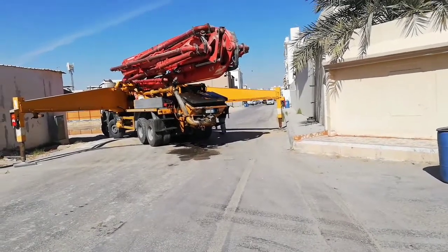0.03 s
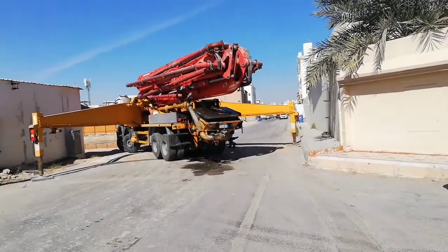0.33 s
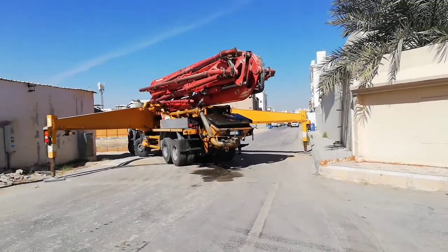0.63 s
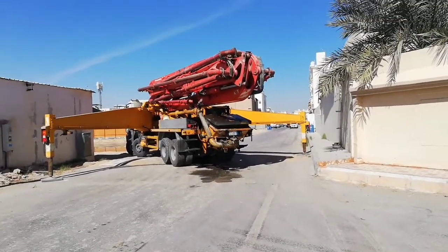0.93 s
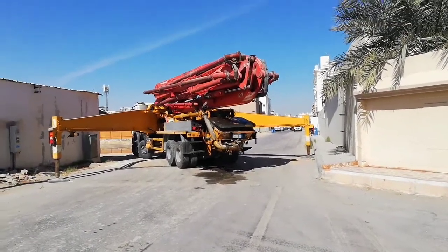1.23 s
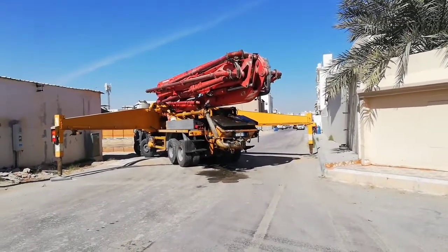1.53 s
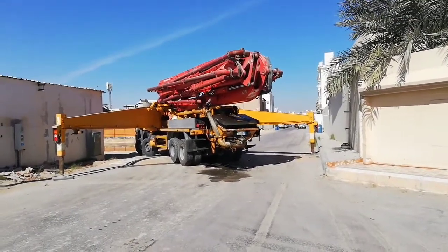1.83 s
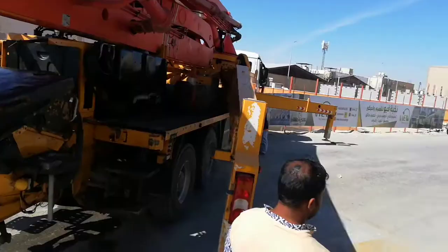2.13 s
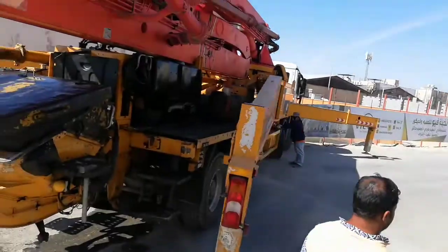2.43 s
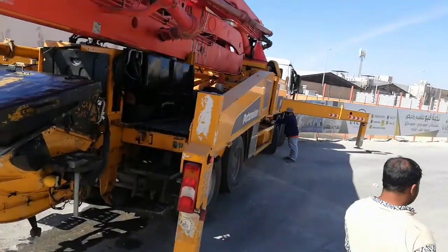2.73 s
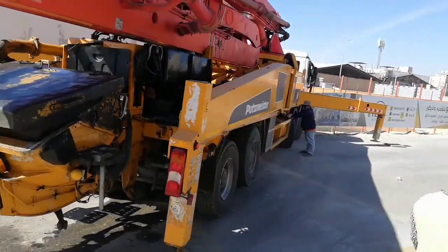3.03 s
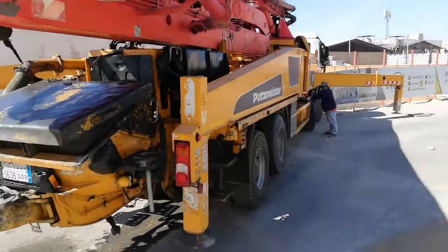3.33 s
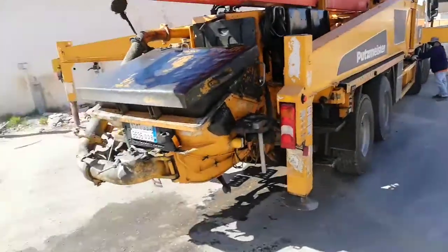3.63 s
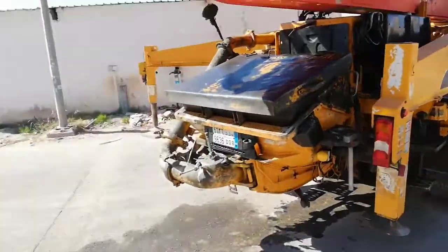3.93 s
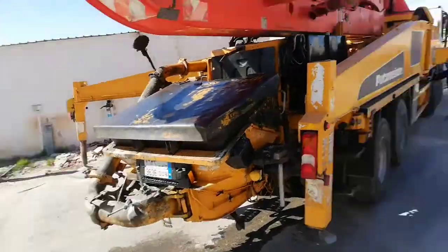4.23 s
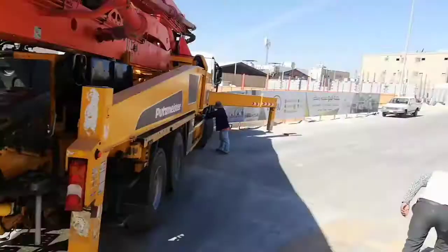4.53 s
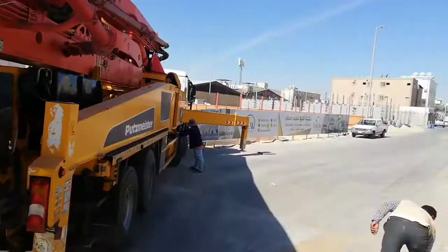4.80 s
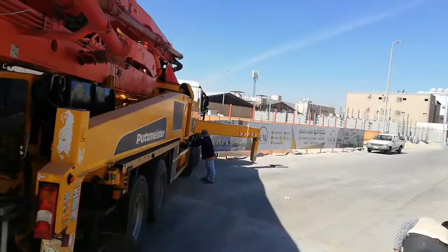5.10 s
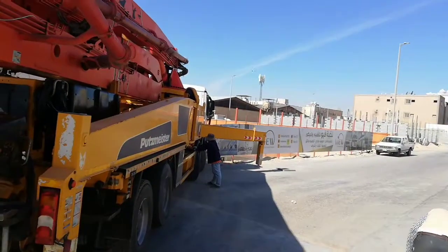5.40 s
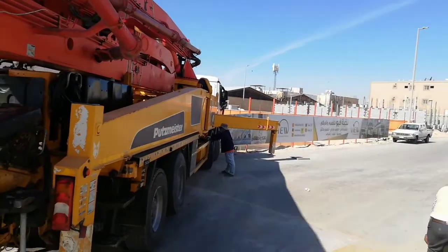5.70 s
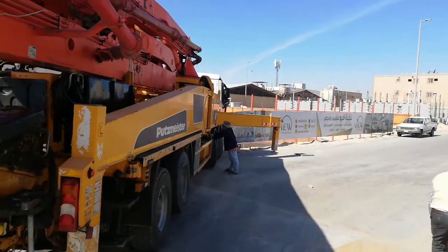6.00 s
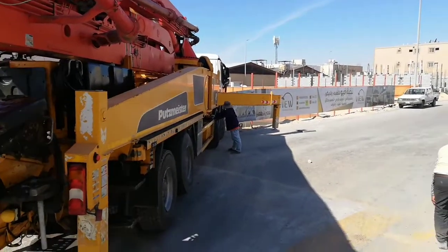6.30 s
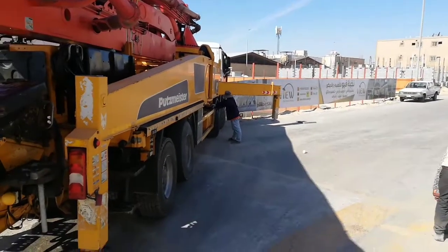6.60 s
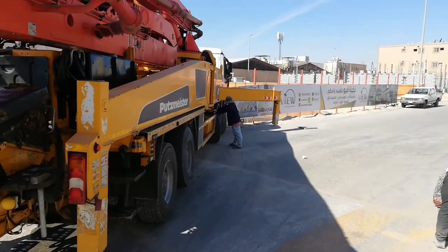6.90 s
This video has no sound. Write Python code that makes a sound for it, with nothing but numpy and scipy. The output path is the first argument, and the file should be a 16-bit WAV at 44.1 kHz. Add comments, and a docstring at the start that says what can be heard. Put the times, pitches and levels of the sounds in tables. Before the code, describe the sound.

From some way down a street comes the even whine and diesel drone of a concrete pump truck. After a moment of silence the machine is right alongside, rumbling and clattering. A quick cluster of steel clanks and scrapes stands out, followed by narrow high hisses and a faint short rattle as the whine wavers on. The hand-held microphone moves beside the truck, catching light wind and a few dull thuds.

```python
"""A truck-mounted concrete pump whines in a walled street: its piston and gear pumps ripple the oil.
The diesel that drives them throbs and clatters; there are narrow high hisses and one brief rattle.
It is heard from afar, then, after a short silence, from beside the truck, where a steel part clanks
and scrapes by stick-slip friction and the listener walks round to stand aside.
Light gusts and bumps reach the hand-held microphone."""
import sys
import numpy as np
from scipy import signal
from scipy.fft import rfft, irfft
from scipy.io import wavfile
from scipy.ndimage import uniform_filter1d

SR = 44100
rng = np.random.default_rng(int(sys.argv[2]) if len(sys.argv) > 2 else 0)


def wav_record(signal):
    """Record a signal, one row per channel, as 16-bit PCM in the file named by sys.argv[1]."""
    frames = np.transpose(np.atleast_2d(signal))
    bounded = np.clip(frames, -1, 1)
    # unit amplitude maps onto the largest positive 16-bit level
    quanta = np.round(bounded * 32767).astype(np.int16)
    wavfile.write(sys.argv[1], SR, quanta)


N = 315315
TIME, FREQS = np.arange(N) / SR, np.fft.rfftfreq(N, 1 / SR)
FAR_ENDS_S, NEAR_STARTS_S, WALK_STARTS_S, WALK_ENDS_S = 1.962, 2.279, 3.35, 3.87


def amp(db):
    """Decibels to amplitude ratio."""
    return 10 ** (np.asarray(db) / 20)


def unit(x):
    """Normalisation to rms 1."""
    return x / np.sqrt(np.mean(abs(x) ** 2) + 1e-20)


def curves(rows):
    """Linear interpolation of each column of a time table."""
    time_s, *columns = np.transpose(rows)
    return [np.interp(TIME, time_s, column) for column in columns]


def spectrum(points):
    """Interpolation of a table over log frequency."""
    hz, value = np.transpose(points)
    return np.interp(np.log(FREQS + 1), np.log(hz + 1), value)


def drift(rate_hz, size=4096):
    """Random modulation: low-passed noise of rms 1."""
    hz = np.fft.rfftfreq(size, TIME[-1] / size)
    slow = irfft(rfft(rng.standard_normal(size)) / (1 + (hz / rate_hz) ** 4))
    return np.interp(TIME, np.linspace(0, TIME[-1], size), unit(slow))


def colour(x, points):
    """Spectral shaping; the mean of the channels has rms 1."""
    shaped = irfft(rfft(x) * amp(spectrum(points)), N)
    return shaped / shaped.mean(0).std()


def tone(cycles, level_db, flutter, flutter_hz, pan_db=0, lead_rad=0):
    """A partial as a steady plus a random phasor; flutter (0-1) is the random one's amplitude."""
    left = amp(pan_db / 2) * np.exp(.5j * lead_rad) * np.ones(N)
    pair = np.array([left, 1 / left])
    phasor = np.sqrt(1 - flutter ** 2) + flutter * (drift(flutter_hz) + 1j * drift(flutter_hz)) / 2 ** .5
    wave = phasor * np.exp(2j * np.pi * (cycles + rng.random()))
    return np.sqrt(2) * amp(level_db) * (pair * wave).real / abs(pair.mean(0))


def far_or_near(far, near):
    """A step from the distant value to the one beside the truck."""
    return np.where(TIME < FAR_ENDS_S, far, near)


def standpoint(far, close, aside):
    """A step from far to close, then a ramp during the walk."""
    return far_or_near(far, np.interp(TIME, [WALK_STARTS_S, WALK_ENDS_S], [close, aside]))


# Likeness of the two microphone ports: frequency_hz, coherence
COHERENCE = [(60, 0.85), (200, 1), (400, 0.25), (800, 0.35), (1500, 0.12), (4000, 0.17), (9000, 0.11),
             (15000, 0.28)]
# Balance from afar and beside the truck: frequency_hz, left_minus_right_db
FAR_BALANCE = [(60, 0), (110, -12), (200, -4), (380, -8.5), (700, 8), (1290, -6.5), (2380, -1), (4400, -6),
               (8120, -1), (15000, 1.5)]
NEAR_BALANCE = [(60, 0), (110, -2.5), (200, 0), (380, 2), (700, -5), (1290, -5.5), (2380, -5.5), (4400, -7),
                (8120, -2), (15000, -4.5)]

def ports(a, b, far_lag_ms=-0.338, near_lag_ms=0.3045):
    """Partial coherence: two independent signals mix into a pair with time and level differences."""
    right, coherence = rfft(a), spectrum(COHERENCE)
    left = coherence * right + np.sqrt(1 - coherence ** 2) * rfft(b)
    pairs = []
    for lag_ms, balance in (far_lag_ms, FAR_BALANCE), (near_lag_ms, NEAR_BALANCE):
        delayed = left * np.exp(-2j * np.pi * FREQS * lag_ms / 1000)
        pairs.append(irfft(np.array([delayed, right]) * amp(np.outer([.5, -.5], spectrum(balance))), N))
    return far_or_near(*pairs)


def air():
    """Turbulence: broadband noise, partly coherent at the two ports."""
    return ports(*rng.standard_normal((2, N)))


# Gusts: peak_s, strength_db, rise_s, fall_s
GUSTS = [(.82, -24.5, .15, 0.097), (3.62, -24, 0.27, 0.63), (5.1, -37, 0.68, .6)]
# Wind spectrum: frequency_hz, density_db
WIND_SPECTRUM = [(15, -30), (26, -14), (38, -3.5), (62, -1.5), (100, -5.5), (200, -28), (400, -41),
                 (1000, -66)]

def wind(breeze_db=-39.5):
    """Turbulent pressure at the microphone: an uneven rumble, alike at both ports."""
    strength = amp(breeze_db)
    for peak_s, db, rise_s, fall_s in GUSTS:
        width_s = np.where(TIME < peak_s, rise_s, fall_s)
        strength = strength + amp(db) * np.exp(-((TIME - peak_s) / width_s) ** 2)
    return strength * amp(2.7 * drift(9) - 2.5) * colour(rng.standard_normal((1, N)), WIND_SPECTRUM)


# Bumps on the microphone: start_s, level_db, length_s, pitch_hz
BUMPS = [(1.02, -30.5, 0.13, 288), (1.43, -34, 0.22, 272), (3.477, -15.5, 0.047, 249),
         (3.493, -22.5, 0.16, 201), (5.237, -24, 0.082, 224), (5.303, -26, 0.12, 232)]

def bumps():
    """Structure-borne sound: soft thuds, an octave wide, shake both ports alike."""
    out = np.zeros(N)
    for start_s, db, length_s, hz in BUMPS:
        octave = signal.butter(2, [hz / np.sqrt(2), hz * np.sqrt(2)], "band", fs=SR, output="sos")
        thud = unit(signal.sosfilt(octave, rng.standard_normal(N)))
        out += amp(db) * thud * np.sin(np.pi * np.clip((TIME - start_s) / length_s, 0, 1))
    return out


def walls(x, delays_ms=(4.3, 11, 27), gains=(.25, .3, .16)):
    """Comb filtering: echoes from the ground, the truck and a wall interfere with the direct sound."""
    comb = 1 + sum(g * np.exp(-2j * np.pi * FREQS * ms / 1000) for ms, g in zip(delays_ms, gains))
    return irfft(rfft(x) * unit(comb), N)


# Narrow bands of noise, high hisses and one brief rattle near 3 kHz:
# start_s, length_s, starting_pitch_hz, relative_level_db
NOISE_BANDS = [(3.883, .08, 6300, -43), (4.0, 1.15, 9650, -47.5), (4.42, 0.11, 2920, -42.5),
               (5.277, 2.0, 9120, -42.5)]

def hisses_and_rattle(width_hz=1200, glide_hz_per_s=330, fade_db_per_s=1, edge_s=0.042, gain_db=6):
    """Narrow-band noise: each band glides upwards and fades while it sounds."""
    noise = rng.standard_normal((2, N)) + 1j * rng.standard_normal((2, N))
    band = signal.sosfilt(signal.butter(2, width_hz / 2, fs=SR, output="sos"), noise)
    out = np.zeros((2, N))
    for start_s, length_s, hz, db in NOISE_BANDS:
        age = TIME - start_s
        envelope = np.clip(np.minimum(age, length_s + edge_s - age) / edge_s, 0, 1)
        carrier = np.exp(2j * np.pi * np.cumsum(hz + glide_hz_per_s * age) / SR)
        out += envelope * amp(db + gain_db - fade_db_per_s * age) * unit((band * carrier).real)
    return out * amp([[-.5], [.5]])


# Modes of the steel part: frequency_hz, level_db, t60_s
STEEL_MODES = [(692, -21, 0.065), (880, 2, 0.087), (1140, -5, 0.087), (1434, 1.5, 0.055), (1703, -1, 0.12),
               (2097, 0, 0.14), (2230, 3.5, 0.28), (2290, -4, 0.3), (2300, -4, 0.18), (3530, 2, 0.014),
               (4260, 1.5, 0.011), (5090, -3, 0.025), (6500, -23, .005), (7780, -0.5, 0.015),
               (9800, -1, 0.024)]
# Spectra of a heavy grind and a fast, light scrape: frequency_hz, density_db
GRIND_SPECTRUM = [(150, -2), (400, -10.5), (800, 11), (1400, 4.5), (1900, 5.5), (2250, 5), (2700, -0.5),
                  (3600, -7), (6000, -16), (10000, -43), (11500, -42), (16000, -48)]
SCRAPE_SPECTRUM = [(150, -13), (800, -10.5), (2000, -4), (2900, -5), (3600, 6.5), (4600, 3.5), (6000, 4.5),
                   (8000, 8), (9800, 10), (10800, 1), (11600, -19), (16000, -14)]
# Blows: start_s, force_db, hold_s, brightness (0-1), ring_over_rasp_db, focus_hz, grind_t60_s
CLANKS = [(3.246, -14, 0.015, 0.31, 6.5, 3600, 0.59), (3.313, -11, 0.015, 0.04, 3.5, 1990, 0.43),
          (3.408, -18.5, .012, 0.06, 5, 3900, 0.11), (3.432, -8.5, 0.015, 1, 1.5, 8340, 0.65),
          (3.734, -24, 0.0069, 0.02, -12, 1350, 0.049)]

def steel(stick_slip_db=3, focus_db=12, pan_db=1.5):
    """Stick-slip friction drives damped modes: each blow is a short rasp, then a duller grinding."""
    mode_hz, mode_db, mode_t60 = np.transpose(STEEL_MODES)
    t = TIME[:SR // 2, None]
    modes = amp(-60 * t / mode_t60) * np.sin(2 * np.pi * mode_hz * t) / np.sqrt(mode_t60)
    grind, scrape, contact = colour(air(), GRIND_SPECTRUM), colour(air(), SCRAPE_SPECTRUM), air()
    slips = amp(stick_slip_db * np.tanh(drift(150)) - 5)

    def rub(start_s, db, hold_s, bright, ring_db, focus_hz, rise_s, t60_s):
        """Selective excitation: the point of contact favours the modes near focus_hz."""
        age = TIME - start_s
        release_db = 60 * np.maximum(age - rise_s - hold_s, 0) / t60_s
        force = slips * np.clip(age / rise_s, 0, 1) * amp(db - release_db)
        rasp = force * (np.sqrt(1 - bright) * grind + np.sqrt(bright) * scrape)
        response = modes @ amp(mode_db - focus_db * np.log2(mode_hz / focus_hz) ** 2)
        ring = signal.oaconvolve(force * contact, response[None] / np.linalg.norm(response), axes=1)
        return rasp + amp(ring_db) * ring[:, :N]

    out = np.zeros((2, N))
    for start_s, db, hold_s, bright, ring_db, focus_hz, grind_t60_s in CLANKS:
        out += rub(start_s, db, hold_s, bright, ring_db, focus_hz, rise_s=0.0015, t60_s=0.14)
        out += rub(start_s, db - 6, hold_s, 0.32 * bright,
                   ring_db=-4.5, focus_hz=2250, rise_s=0.023, t60_s=grind_t60_s)
    return out * amp([[pan_db / 2], [-pan_db / 2]])


# Shaft speed, given as the whine at twice the piston rate: time_s, pitch_hz
SHAFT_SPEED = [(0.0, 800.9), (0.82, 795.9), (1.0, 784.9), (1.3, 783.5), (1.9, 792.2), (2.6, 795.1),
               (4.35, 791.8), (4.75, 795.6), (5.2, 793.6), (7.15, 794.7)]

def whine_hz():
    """Rotational orders: every engine and pump tone is proportional to this pitch."""
    return curves(SHAFT_SPEED)[0]


def load(free_hz=796, full_sag_hz=11.5):
    """Speed droop: the load (0-1) shows in how far the shaft slows."""
    return np.clip((free_hz - whine_hz()) / full_sag_hz, 0, 1)


def stroke(start_s=5.2, rise_s=0.023, hold_s=0.38, fade_s=0.38):
    """Envelope (0-1) of one hard pump stroke: attack, hold, exponential decay."""
    age = TIME - start_s
    return np.clip(age / rise_s, 0, 1) * np.exp(-np.maximum(age - rise_s - hold_s, 0) / fade_s)


def flare(holds_until_s=2.45, ends_s=2.68):
    """Envelope (0-1) that leaves the machinery louder until just after it is first heard close."""
    return np.interp(TIME, [holds_until_s, ends_s], [1, 0])


def clatter_db():
    """Reference level of the clatter and of the weak pump partials."""
    return standpoint(-42.5, -36, -37.5) + 3.5 * flare()


# Spectra of the diesel's clatter and the fan's hiss: frequency_hz, density_db
CLATTER_SPECTRUM = [(200, -7.5), (450, -5.5), (600, 1), (850, 1.5), (1000, 2), (1250, 4.5), (1500, -1.5),
                    (2050, -2.5), (2600, -6.5), (3100, -10.5), (3600, -9.5), (5000, -19), (9000, -61.5)]
FAN_SPECTRUM = [(1500, -7.5), (3200, -4), (4200, -1), (5200, -1), (6300, -2.5), (7600, -1), (9800, 0),
                (10600, -4.5), (11300, -8.5), (13000, -17.5), (15800, -36)]

def clatter(firing_hz=80.9, depth=0.083, ticks_per_s=500, tick_share=0.31, spread_db=8.5, gain_db=4.5):
    """Amplitude modulation: combustion noise and metal ticks swell at each firing, under a fan's hiss."""
    firing_cycles = np.cumsum(firing_hz * (1 + 0.014 * drift(9.7))) / SR
    firing = 1 + depth * np.cos(2 * np.pi * firing_cycles)
    impulses = (rng.random((2, N)) < ticks_per_s / SR) * rng.choice([-1, 1], (2, N))
    ticks = impulses * amp(spread_db * np.minimum(rng.exponential(1, (2, N)), 3))
    drive = (air() + tick_share * unit(ports(*ticks))) * firing
    knock = amp(clatter_db() + 1.3 * drift(25)) * colour(drive, CLATTER_SPECTRUM)
    hiss_db = standpoint(-51.5, -44, -45) + 2 * stroke() - 1.5 * load() + 5 * flare()
    hiss = amp(hiss_db + .5 * drift(46)) * colour(air() + 0.14 * drive, FAN_SPECTRUM)
    return amp(gain_db) * (knock + hiss)


# Engine partials: multiple_of_hum, level_over_rumble_db, flutter
THROB_PARTIALS = [(.446, -3, 0.46), (.5, -2, 0.5), (.631, -13.5, 0.1), (.7, -6, 0.3), (.791, -10.5, 0.4),
                  (.905, -8, 0), (1.095, -5, 0), (1.191, -14, .4), (1.314, -8, 0.4), (1.402, -14, 0.9),
                  (1.5, -7, 0.33), (1.578, -15.5, 0.1), (1.685, -13.5, 0.6), (2.5, -24.5, 0.4)]
# Engine rumble: frequency_hz, density_db
RUMBLE_SPECTRUM = [(25, -35), (45, -5.5), (80, -1), (130, -3.5), (210, -1), (280, -1), (350, -6),
                   (480, -5.5), (600, -16), (1200, -36)]

def engine(hum_per_whine=.2191, retreat_db_per_s=1.03, panel_multiple=2.79):
    """Beating: weaker partials throb against the hum, over a rumble and a panel in forced vibration."""
    far_rumble_db = np.interp(TIME, [0, FAR_ENDS_S], [-40.5, -35])
    rumble_db = standpoint(far_rumble_db, -33.3, -31.5) + 1.05 * flare()
    retreat_db = retreat_db_per_s * np.maximum(TIME - WALK_ENDS_S, 0)  # the listener backs away
    hum_db = standpoint(-38, -30, -22.5) - retreat_db
    cycles = np.cumsum(hum_per_whine * whine_hz()) / SR
    out = tone(cycles, hum_db, flutter=0.057, flutter_hz=4.7, lead_rad=-0.356)
    for multiple, db, flutter in THROB_PARTIALS:
        out += tone(multiple * cycles, rumble_db + db, flutter, flutter_hz=3, lead_rad=-.3 * multiple)
    panel_db = standpoint(-62.5, -40, -55)
    out += tone(panel_multiple * cycles, panel_db, flutter=0.12, flutter_hz=11, pan_db=-9)
    return out + amp(rumble_db) * colour(air(), RUMBLE_SPECTRUM)


# The whine, as direct and reflected sound interfere at the moving listener:
# time_s, level_db, left_minus_right_db, left_lead_rad
WHINE_AT_LISTENER = [(0.05, -31.5, 1, 1.4), (0.55, -32.5, -6.5, 1.2), (0.88, -38.5, -7, 1.2),
                     (1.02, -23.5, -1, 0.8), (1.42, -24, 0, 0.6), (1.9, -31.5, -12.5, 1.5),
                     (2.3, -30, 5.4, 1.2), (2.7, -37, -6.5, 3), (3.1, -25.5, -7.5, 0.2),
                     (3.55, -30.5, 0.6, 1.5), (3.78, -28, -16, -1.5), (4.0, -28, 2, 0.4),
                     (4.5, -27.5, -23, 1.2), (4.72, -31, 4, -1.3), (5.2, -29, -3, -1.1),
                     (5.7, -27, 6.5, -1.5), (6.25, -25.5, -2, -1.45), (7.15, -30, 3.3, -2.5)]
# Fundamentals of the two pumps beside the truck: time_s, level_db
NEAR_PISTON_LEVEL = [(2.3, -34.6), (2.8, -35.5), (3.1, -40.3), (4.4, -41.5), (4.85, -32.5), (5.5, -41),
                     (6.5, -34.5), (7.15, -32)]
NEAR_GEAR_LEVEL = [(2.3, -37), (2.5, -30.5), (2.7, -45), (3.15, -31), (3.8, -34), (4.05, -58), (4.5, -47),
                   (4.85, -33.0), (5.3, -49), (7.15, -38.5)]
# Harmonics and a sum tone: piston_order, gear_order, far_db, close_db, aside_db, effort_gain_db, flutter
UPPER_PARTIALS = [(5, 0, -57.5, -45.5, -45.5, 6, 0.93), (8, 0, -68.5, -67, -51.5, 8, 0.6),
                  (9, 0, -67, -72, -59, 11, 0.6), (0, 2, -51.5, -48.5, -51.5, 6, .4),
                  (1, 1, -57.5, -37, -57, 8, 0.62)]
# Weak partials: piston_order, relative_level_db, flutter
WEAK_PARTIALS = [(3.01, -20, 1), (3.927, -13.5, 0.8), (23.8, -28, .4)]

def pumps(gear_per_piston=3.226, pressure_peak_s=.71, pressure_width_s=0.11):
    """Periodic pressure ripple: a piston pump and a gear pump on one shaft radiate tones."""
    piston = np.cumsum(whine_hz() / 2) / SR  # phase in cycles
    gear = piston * gear_per_piston
    # Pressure builds just before the load is taken up, and the gear pump sings out.
    pressure_db = 4.5 * np.exp(-((TIME - pressure_peak_s) / pressure_width_s) ** 2)
    # From afar, load strengthens the piston tone and quietens the gear tone.
    piston_db = far_or_near(-48.5 + 18 * np.sqrt(load()), curves(NEAR_PISTON_LEVEL)[0])
    gear_db = far_or_near(-34 - 11.5 * load(), curves(NEAR_GEAR_LEVEL)[0]) + pressure_db
    whine_db, pan_db, lead_rad = curves(WHINE_AT_LISTENER)
    out = tone(2 * piston, whine_db + 0.96 * drift(6), flutter=0.19, flutter_hz=35.5,
               pan_db=pan_db, lead_rad=lead_rad)
    out += tone(piston, piston_db, flutter=0.2, flutter_hz=21,
                pan_db=standpoint(-2.5, -3, 2.5), lead_rad=standpoint(-1.35, -2.35, 1))
    out += tone(gear, gear_db, flutter=far_or_near(0.19, 0.43), flutter_hz=24,
                pan_db=-3.5, lead_rad=standpoint(.8, -0.37, 2))
    effort = np.maximum(load() ** 2, stroke())
    for piston_order, gear_order, far_db, close_db, aside_db, effort_db, flutter in UPPER_PARTIALS:
        swell_db = effort_db * effort + gear_order * pressure_db + 2.1 * drift(0.8)
        level_db = standpoint(far_db, close_db, aside_db) + swell_db
        out += tone(piston_order * piston + gear_order * gear, level_db, flutter, flutter_hz=36.4,
                    pan_db=-12.5, lead_rad=2.1 * np.tanh(drift(0.77)))
    for order, db, flutter in WEAK_PARTIALS:  # short waves fade in and out among the reflections
        out += tone(order * piston, clatter_db() + db + 2 * drift(0.97), flutter, flutter_hz=29,
                    pan_db=0.5, lead_rad=1.2 * np.tanh(drift(0.57)))
    return out


def scene():
    """Superposition of all sources; the clatter, hisses and rattle also echo."""
    return engine() + pumps() + walls(clatter() + hisses_and_rattle()) + steel() + wind() + bumps()


def limiter(x, threshold_db=-13, slope=0.68, recovery_db_per_s=30):
    """Dynamic compression: the gain drops at once under loud clanks and recovers slowly."""
    power_db = 10 * np.log10(abs(uniform_filter1d((x ** 2).mean(0), size=400)) + 1e-12)
    recovery_db = recovery_db_per_s * TIME
    held_db = np.maximum.accumulate(power_db + recovery_db) - recovery_db
    excess_db = np.maximum(held_db - threshold_db, 0)
    return x / amp(slope * uniform_filter1d(excess_db, size=200))


def record(dry, ceiling=.85, cutoff_hz=15700):
    """Limiting and clipping, silence between the far and close standpoints, then a band limit."""
    gate = uniform_filter1d(((TIME < FAR_ENDS_S) | (TIME > NEAR_STARTS_S)) * 1., size=128)
    clipped = np.clip(limiter(dry), -ceiling, ceiling)
    lowpass = signal.firwin(511, cutoff_hz, window=("kaiser", 9), fs=SR)
    return signal.oaconvolve(clipped * gate, lowpass[None], "same")


dry = scene()
out = record(dry)
wav_record(out)
```